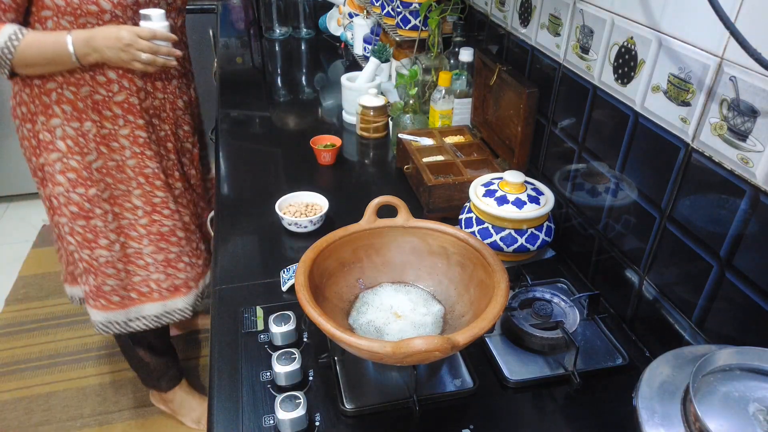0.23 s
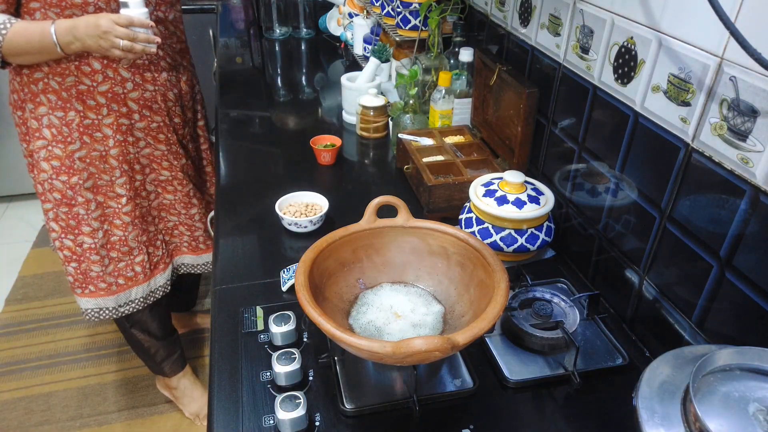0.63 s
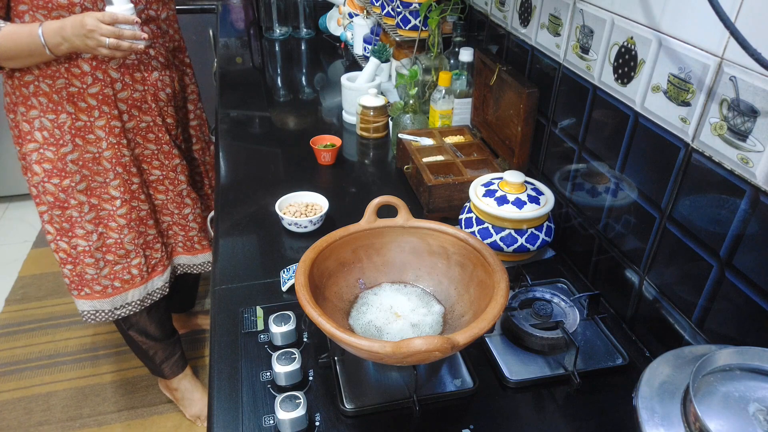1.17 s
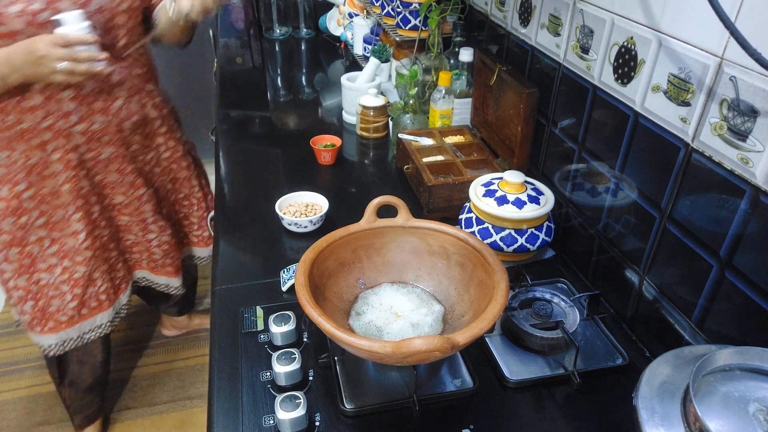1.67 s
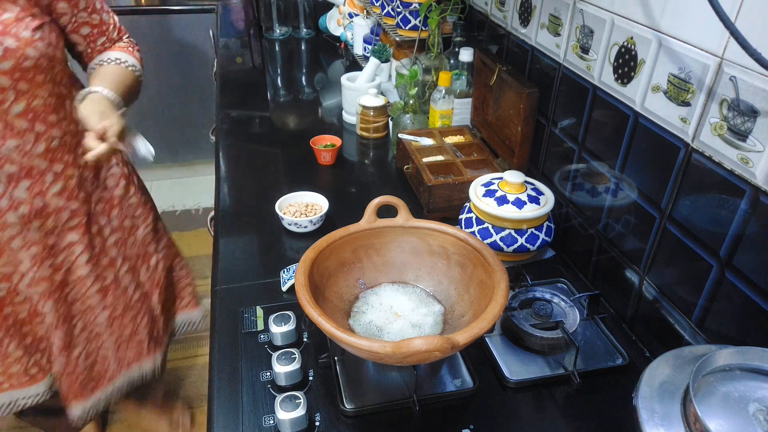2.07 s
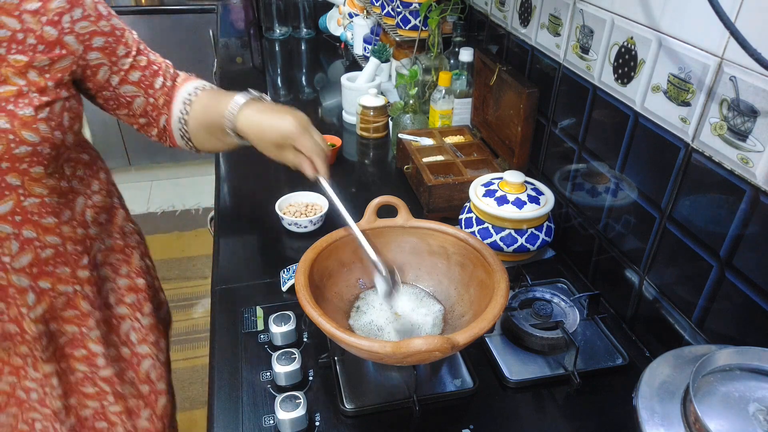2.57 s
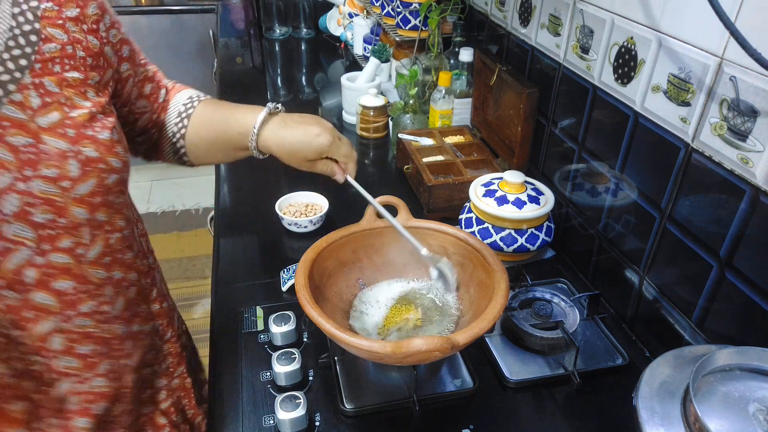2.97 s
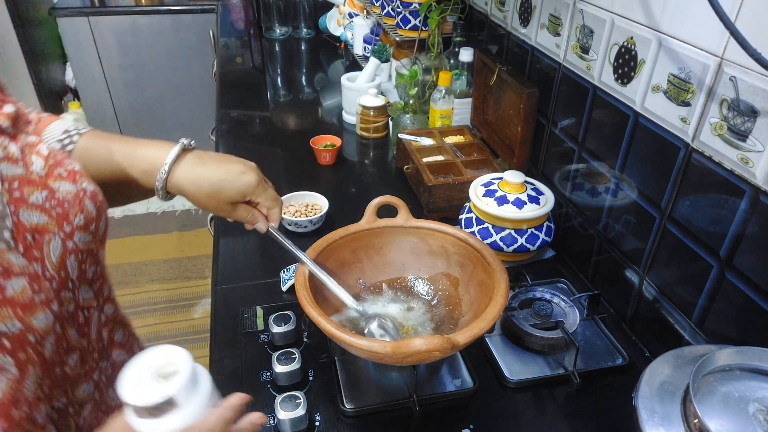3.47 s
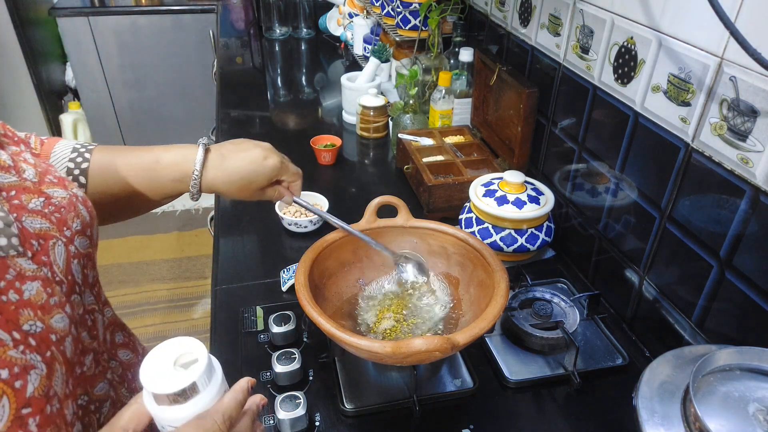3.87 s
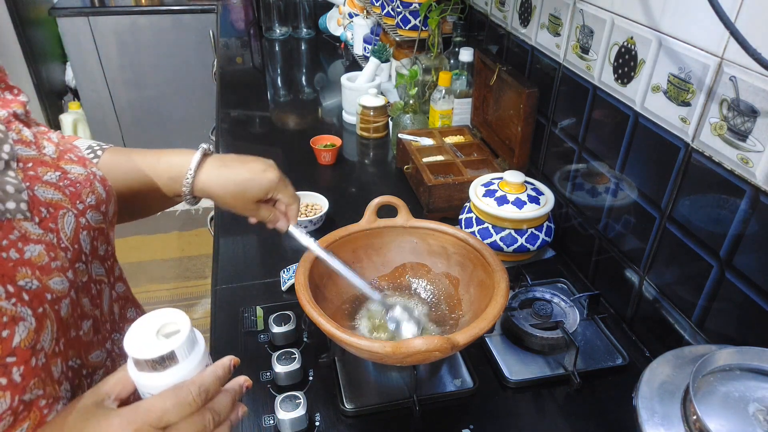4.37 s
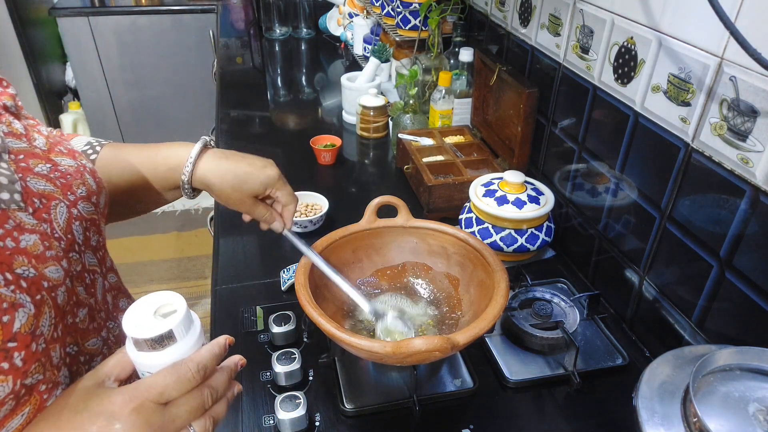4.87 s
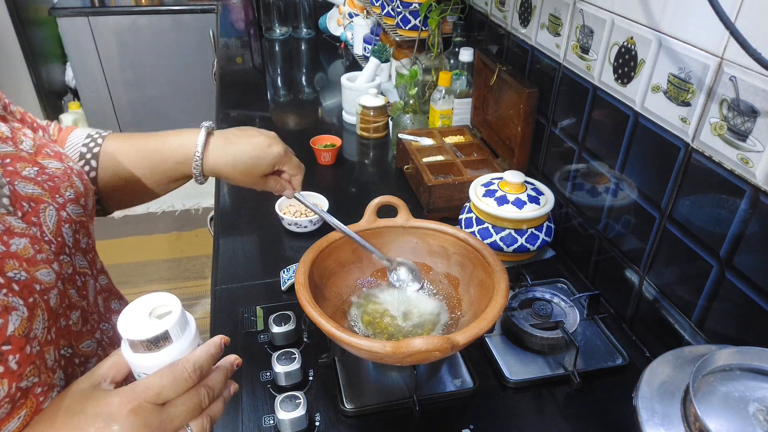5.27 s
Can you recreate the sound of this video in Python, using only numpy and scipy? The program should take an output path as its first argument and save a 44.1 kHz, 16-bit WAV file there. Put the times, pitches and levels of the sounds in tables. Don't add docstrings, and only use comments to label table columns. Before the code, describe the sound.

Close stereo sound of cooking in a hard, short-echo kitchen. Bright seed cracks dominate the first half, with handling rustle, a wooden drawer thud and a brief metallic scrape. Just before three seconds the ladle clacks into the pot; rhythmic gritty scrapes, hollow clay rings and wet oil gurgles follow while popping nearly stops. A soft low fan hum and fine hiss run throughout.

```python
import sys
import numpy as np
from scipy import signal
from scipy.fft import rfft, irfft, next_fast_len
from scipy.io import wavfile
from scipy.ndimage import uniform_filter1d, map_coordinates

SR = 44100
rng = np.random.default_rng(int(sys.argv[2]) if len(sys.argv) > 2 else 0)


def to_wav(s):
    ch = np.atleast_2d(s).T
    pcm = np.round(np.clip(ch, -1, 1) * 32767)
    wavfile.write(sys.argv[1], SR, pcm.astype(np.int16))


def attenuation_scalar(level_db):
    decades = np.asarray(level_db, float) / 20
    return 10 ** decades


N = 242991

# [t/s, level/dB]
FAN_STRENGTH = [(0, -43.5), (.9, -48.5), (1.6, -50), (2.5, -49.5), (3.4, -44), (3.8, -47), (4.5, -46.5),
                (5.51, -46.5)]
# [f/Hz, level/dB per Hz]
FAN_AIR = [(12, -70), (28, -49), (64, -16.5), (91, -11), (109, -3), (129, -7), (172, -12), (265, -14),
           (312, -13.5), (439, -19.5), (481, -11.5), (619, -27.5), (1500, -48.5), (1950, -95.5),
           (3300, -120)]
# [f/Hz, width/Hz, level/dB]
FAN_MOTOR = [(96.96, 6.54, 1.5), (312.8, 3.3, -12)]
# [t/s, level/dB]
FIZZ_STRENGTH = [(0.0, -56.5), (1.27, -51), (1.58, -63), (3.28, -54), (3.53, -49), (4.05, -58),
                 (4.33, -51.5), (4.51, -56), (5.51, -57)]
# [f/Hz, level/dB per Hz]
FIZZ_COLOUR = [(350, 6.5), (600, 4.5), (781, 3.5), (1180, -11.5), (1420, -4), (2570, -11), (6160, -13),
               (13000, -20), (15800, -19), (16500, -42.5)]
# [f/Hz, level/dB]
FIZZ_SIDE = [(300, -4.5), (800, 0.5), (3000, 2.5)]
# [f/Hz, t60/s]
KITCHEN_DECAY = [(300, 0.733), (1300, 0.379), (3500, 0.318), (9000, 0.2303), (16000, 0.2054)]
# [f/Hz, likeness 0-1]
ROOM_LIKENESS = [(300, .85), (700, .3), (1500, 0)]
# [left t/s, right t/s, level/dB]
COUNTER_ECHOES = [(.0017, 0.002, -37), (.0041, 0.0033, -7.5)]
# [f/Hz, level/dB per Hz]
MIC_HISS = [(1000, -120), (2000, -11), (6000, -7), (10000, -3), (13000, 4.5), (16000, -11)]
# [f/Hz, level/dB]
MIC_DIFFERENCE = [(200, 1), (5000, -1), (9000, -1), (13000, 5)]

# [t/s, rise/s,
# fade/s, dull level/dB, bright level/dB]
RUSTLES = [
    (0.011, 0.29, 0.059, -29, -23),
    (0.56, 0.021, 0.64, -39, -69.5),
    (0.704, 0.288, 0.064, -25.5, -22.5),
    (0.817, 0.021, 0.146, -28, -30.5),
    (0.882, 0.0116, 0.055, -44.5, -22.5),
    (0.96, 0.254, 0.583, -32.5, -28.5),
    (2.564, 0.04, 0.24, -46, -36.5),
    (2.744, 0.041, 0.112, -44, -48.5),
    (3.26, 0.097, 0.52, -58, -30.5),
]
# [f/Hz, level/dB per Hz]
RUSTLE_DULL = [(400, -120), (800, -3), (1500, 5), (2500, 5), (4500, 4), (7000, -18), (16000, -30.5)]
# [f/Hz, level/dB per Hz]
RUSTLE_BRIGHT = [(2000, -120), (4000, -2.5), (7000, -1), (10000, -5), (13000, 1), (16000, -8)]
# [t/s, peak level/dB]
DRAWER_THUDS = [
    (0.656, -18),
]
# [f/Hz, level/dB, t60/s]
CABINET_TONES = [(325.8, -5.5, 0.095), (394.3, -6.5, 0.189), (435.7, -1.5, 0.16), (489.5, -1, 0.162),
                 (569, -7.5, 0.204), (731.8, -5, 0.0767), (899, -4, 0.041), (1140, -14, 0.128)]
# [t/s, peak level/dB, centre f/Hz, t60/s]
LOW_BUMPS = [
    (0.705, -31.5, 515, 0.23),
    (1.204, -30.5, 322, 0.2),
    (1.264, -35, 367, 0.212),
    (2.843, -33.5, 407.5, 0.06),
    (2.844, -30, 728, 0.0524),
    (3.49, -35, 273, 0.497),
    (4.438, -36.5, 292, 0.053),
    (4.948, -38.5, 285, 0.175),
]
# [t/s, peak level/dB, centre f/Hz]
UTENSIL_KNOCKS = [(0.029, -32.5, 1410), (0.13, -28.5, 2860), (0.151, -15.5, 3500), (0.542, -31, 3177),
                  (0.657, -21.5, 890), (0.707, -45, 2860), (0.819, -26.5, 917), (0.819, -18.5, 1900),
                  (1.477, -32, 1556), (1.52, -48, 1510), (1.577, -41.5, 1490), (1.886, -26.5, 2940),
                  (2.129, -31, 4140), (2.508, -29, 3080), (2.563, -18.5, 3420), (2.607, -21.5, 3180),
                  (2.63, -21.5, 2296), (2.744, -25, 4100), (2.845, -16.5, 4000), (2.876, -16, 2950),
                  (2.89, -17.5, 4540), (3.106, -15.5, 2294), (3.144, -16, 3490), (3.256, -15.5, 3450),
                  (3.401, -37.5, 1325), (3.963, -36, 2720), (4.092, -16.5, 3220), (4.752, -31.5, 2150),
                  (5.415, -24.5, 2700)]

# [t/s, held/s, rasp level/dB]
LADLE_TUGS = [
    (1.145, .004, -34),
    (1.163, .006, -24.5),
    (1.198, .035, -17.5),
]
# [f/Hz, level/dB per Hz]
RASP_COLOUR = [(350, -27), (600, -11.5), (1360, -6), (1670, 1), (2060, -4), (2340, 4.5), (3690, -2.5),
               (4420, -2.5), (6160, -1.5), (13000, 0), (15600, -4.5), (16500, 1)]
# [f/Hz, width/Hz, level/dB]
STEEL_TONES = [(4100, 153, -12), (6815, 8, -21.5), (7440, 18.7, 1.5), (8064, 10, -4.5), (4495, 98, -6),
               (11790, 12, -9.5)]
# [t/s, peak level/dB, f/Hz, t60/s]
HANDLE_RINGS = [(1.199, -24, 2360, .06), (1.165, -33, 8240, .08), (1.2, -27, 7830, .08),
                (1.3, -37, 10435, .3), (1.35, -39, 10432, .5), (1.325, -35, 2640, .22),
                (1.335, -36, 2720, .2), (1.365, -38, 2690, .3), (1.3, -43, 8064, .3),
                (1.41, -50, 8062, .45), (1.33, -47, 6825, .75), (1.478, -50, 4050, .3)]

# [t/s at full force, rise/s, held/s, scrape level/dB, slosh level/dB]
STROKES = [(2.849, 0.0195, 0.0047, -29.5, -44), (3.151, 0.039, .005, -48, -59),
           (3.248, 0.102, 0.0047, -34, -63), (3.377, 0.21, 0.0878, -35, -42.5),
           (3.678, 0.1075, 0.016, -38, -28), (4.089, 0.0743, 0.1486, -33.5, -35),
           (4.41, 0.037, 0.05, -36, -37), (4.753, 0.0019, 0.088, -41, -62),
           (4.863, 0.101, 0.0384, -34.5, -27), (4.972, 0.059, 0.0471, -37.5, -35.5),
           (5.414, 0.0082, 0.027, -63.5, -42), (5.478, 0.017, .05, -37, -28)]
# [f/Hz, level/dB per Hz]
SCRAPE_COLOUR = [(290, -15.5), (500, -9.5), (924, -7), (1390, -7), (1890, -6.5), (3250, -2.5), (4490, -7),
                 (6100, -13), (15100, -23.5), (15800, -22), (16500, -60)]
# [f/Hz, width/Hz, level/dB]
CLAY_TONES = [(1830, 14.7, -6.5), (2150, 50, 14), (2552, 22, 7.5), (2990, 23, 5.5), (3800, 24, -7.5),
              (4357, 30.6, 14.5)]
# [t/s, peak level/dB, f/Hz]
OIL_GLUGS = [(3.302, -22, 1082), (3.338, -22, 1330), (3.348, -26.5, 1433), (3.365, -21, 1128),
             (3.378, -30, 1110), (3.422, -37, 1334), (3.482, -25, 1239), (3.3993, -26.5, 1222),
             (3.4665, -20.5, 1285), (4.115, -27.5, 1514), (4.15, -24.5, 1517), (4.163, -19, 1370),
             (4.181, -45.5, 1420), (4.2106, -23.5, 1228), (4.4325, -23, 1277), (4.821, -24.5, 1535),
             (4.837, -28.5, 1550), (4.852, -23, 1540), (4.872, -20, 1382), (4.888, -19, 1382),
             (4.905, -29, 1453)]
# [t/s, peak level/dB, f/Hz]
GRIT_CHIPS = [(3.2252, -21, 3914), (3.251, -17, 2990), (3.244, -22.5, 4100), (3.261, -24.5, 2623),
              (3.303, -20, 3715), (3.31, -24.5, 3150), (3.36, -24.5, 3260), (3.365, -21, 4100),
              (4.84, -22.5, 3213), (4.99, -25, 4430), (3.32, -17, 3726), (3.323, -20, 4437),
              (3.387, -17, 2429), (3.456, -26, 4440), (3.4002, -26.5, 3130), (3.4419, -18.5, 3058),
              (4.064, -42.5, 3180), (4.0731, -26, 2540), (4.0915, -23, 2360), (4.0943, -25.5, 3120),
              (4.108, -14.5, 3260), (4.215, -26.5, 3130), (4.541, -27, 3710), (4.787, -26, 2106),
              (4.1112, -24.5, 3200), (4.139, -14.5, 3613), (4.2118, -18.5, 3683), (4.406, -23, 3410),
              (4.8636, -14, 3283), (4.873, -23, 2687), (4.892, -18.5, 4414), (4.917, -17.5, 2644),
              (4.919, -22.5, 5175), (4.987, -20, 3075), (4.8943, -34, 3200), (4.9182, -22.5, 3706),
              (4.498, -30.5, 3674)]
# [t/s, peak level/dB]
GRAIN_SNAPS = [(2.8429, -20), (2.8649, -21), (3.7469, -31), (4.0542, -38), (4.0584, -33), (4.0637, -29),
               (4.0717, -29), (4.0854, -27), (4.0906, -22), (4.358, -33), (4.4049, -32), (4.7506, -32),
               (4.7554, -38), (4.7644, -33), (4.7714, -37), (4.7774, -35), (4.7851, -28), (4.7964, -31),
               (4.8744, -22), (4.9312, -22), (5.4146, -27), (5.4559, -27), (5.4746, -27), (5.4839, -25)]
# [f/Hz, level/dB per Hz]
SNAP_COLOUR = [(600, -40), (1300, -10), (2500, 0), (4500, -2), (7000, -12), (16000, -22)]
# [t/s, peak level/dB, f/Hz, t60/s]
EDGE_TOUCHES = [(5.4152, -36.5, 2536, .17), (5.4152, -38.5, 1852, 0.176), (5.4152, -33.5, 3490, 0.039),
                (5.4152, -47.5, 3490, .12), (5.4152, -33, 4267, 0.0355), (5.4152, -38, 5780, 0.024),
                (5.4565, -30, 2589, 0.114), (5.4565, -35.5, 3420, 0.071), (5.4752, -28.5, 2150, 0.046),
                (5.486, -21.5, 2193, 0.035), (5.5, -23.5, 3056, .05), (4.358, -27.5, 3946, 0.0126),
                (4.359, -34.5, 3524, 0.0274), (4.7515, -30.5, 2150, 0.0126), (4.7515, -36.5, 3680, 0.011),
                (2.8455, -16, 4182, 0.0217), (2.851, -27.5, 3870, 0.028), (2.865, -22, 3256, 0.027),
                (2.894, -33.5, 4550, 0.026)]
# [t/s, peak level/dB, upper tones over the lowest/dB]
BOWL_CATCHES = [(3.466, -32, -18), (3.478, -26.5, -11.5), (3.487, -37.5, 9), (3.504, -36, 8.5),
                (3.522, -35.5, 3.5), (3.5368, -36, -17), (3.581, -38.5, -12.5), (3.6372, -32, -14.5),
                (3.657, -27.5, -5), (3.679, -27, 0.5), (3.695, -37, 4), (3.74, -34, 0),
                (4.2119, -21.5, -11.5), (4.228, -26, -1), (4.29, -25.5, -2.5), (4.4373, -24, 1),
                (4.452, -35.5, -15.5), (4.4671, -35.5, -25), (4.358, -34, -13.5), (4.503, -36, -15.5),
                (4.978, -29, -8.5), (4.998, -27.5, -5.5), (5.038, -28.5, -6), (5.052, -39, 7.5),
                (5.415, -54, 0), (5.475, -40.5, 5)]
# [t/s, peak level/dB]
RIM_TAPS = [
    (5.0299, -38),
    (5.066, -32),
    (5.415, -45),
    (5.45, -35),
]
# [f/Hz, level/dB, t60/s]
RIM_TONES = [(1302, 0, .5)]

# [t/s, peak level/dB, body below the crack/dB, left over right/dB]
SEED_POPS = [(0.1508, -9, -9.5, 6), (0.3532, -8, -17.5, -2), (0.3822, -13, -9, -2.5),
             (0.4348, -19, -9, -0.5), (0.622, -22, -8, -4.5), (0.8842, -5.5, -17.5, -5.5),
             (0.9501, -11.5, -10.5, 2.5), (0.98, -18, -22, 9), (1.007, -19, -6.5, -1), (1.086, -31, -8, 9),
             (1.4139, -17, -10, -0.5), (1.7391, -16.5, -19.5, -6), (1.9946, -27.5, -10.5, 0.5),
             (2.0524, -12.5, -18.5, 4.5), (2.243, -33, -14, 1.5), (2.2605, -15.5, -7, -1.5),
             (2.3322, -22, -10, 0.5), (2.3885, -30.5, -14, -1.5), (2.48, -25.5, -10, 0.5),
             (2.5502, -25.5, -12, -7.5), (2.7291, -23, -18, -6.5), (2.8263, -25.5, -10.5, -2),
             (2.933, -22.5, -23, -1), (2.9849, -13.5, -11.5, -1.5), (3.052, -23, -5.5, 4),
             (3.087, -16, -6, 5.5), (3.1577, -22.5, -17.5, -5.5), (3.4126, -12.5, -12, 6),
             (3.4557, -14, -5, 0.5), (3.8479, -29, -11, 7), (1.971, -49.5, -13.5, 8.5),
             (2.8766, -23, -19.5, -0.5), (2.894, -25, -21.5, 5), (3.1273, -32, -23, -0.5),
             (3.17, -21, -26, -5), (3.225, -29, -22, -4), (3.308, -29.5, -7, 3), (4.9318, -36, -3.5, 0),
             (4.5416, -31, 0, 2.5), (4.494, -33.5, -12.5, 0.5)]
# [t/s, peak level/dB, body below the crack/dB, left over right/dB]
SEED_BOUNCES = [(0.5559, -28, 0.5, -0.089), (1.7537, -15.5, -5, 0.26), (2.043, -27, -3, -0.059),
                (2.071, -30.5, -0.5, 2), (2.093, -28, -11.5, 0.047), (2.565, -29, -20.5, 0),
                (2.606, -23.5, -7, 0), (2.7091, -30.5, 0, -1), (2.774, -27.5, -5, 0), (3.436, -23, -6.5, 1)]
# [f/Hz, level/dB per Hz]
CRACK_COLOUR = [(1470, -76), (2500, -10), (4780, -12), (5960, -17), (7670, 1.5), (9720, 0.5), (13700, 7),
                (15600, -0.5), (16500, -36.5)]
# [f/Hz, level/dB per Hz]
BODY_COLOUR = [(500, -120), (900, 8.5), (1600, 14.5), (3000, 20), (5000, 19), (8000, 14), (16000, -29.5)]
# [t/s, left level/dB, right level/dB]
POT_ECHOES = [(.001, -3, 0), (.0019, -13, -10), (.0045, -17, -13)]


def unit(x):
    return x / np.sqrt(np.mean(x ** 2) + 1e-20)


def along(points, hz):
    f, v = np.transpose(points)
    return np.interp(np.log(hz + 1), np.log(f + 1), v)


def level_curve(points):
    s, db = np.transpose(points)
    return np.interp(np.arange(N) / SR, s, db)


def filtered(x, response):
    m = next_fast_len(x.shape[-1] + SR // 2)
    return irfft(rfft(x, m) * response(np.fft.rfftfreq(m, 1 / SR)), m)[..., :x.shape[-1]]


def resonances(modes):
    def response(f):
        total = 0
        for k, (centre, width, db) in enumerate(modes):
            damping = 1j * f * width
            total = total + (-1) ** k * attenuation_scalar(db) * damping / (centre * centre - f * f + damping)
        return total
    return response


def colour(spectrum):
    return lambda f: attenuation_scalar(along(spectrum, f))


def causal(spectrum, size):
    c = irfft(np.log(attenuation_scalar(along(spectrum, np.fft.rfftfreq(size, 1 / SR))) + 1e-4))
    c[1:size // 2] *= 2
    c[size // 2 + 1:] = 0
    pulse = irfft(np.exp(rfft(c)))
    return pulse / np.abs(pulse).max()


def wavelet(spectrum, size=256):
    strength = attenuation_scalar(along(spectrum, np.fft.rfftfreq(size, 1 / SR)))
    pulse = np.roll(irfft(strength * np.exp(-1j)), size // 2) * np.hanning(size) ** 6
    return pulse / np.abs(pulse).max()


def gritty(grit_db, grain_s, channels=1):
    sizes = map_coordinates(rng.standard_normal(N), [np.arange(N) / (grain_s * SR + 1)], order=1)
    return rng.standard_normal((channels, N)) * attenuation_scalar(grit_db * sizes)


def patchy(x, patchy_db):
    z = signal.stft(x, nperseg=256)[2]
    field = uniform_filter1d(rng.standard_normal(z.shape), 3, axis=0)
    field = uniform_filter1d(field, 9, axis=1)
    return signal.istft(z * attenuation_scalar(patchy_db * unit(field)), nperseg=256)[1][:N]


def swell(s, rise, held, fade):
    t = np.arange(N) / SR - s
    before = np.maximum(-t, 0) / max(rise, 1e-3)
    after = np.maximum(t - held, 0) / max(fade, 1e-3)
    return attenuation_scalar(-30 * (before + after))


def add(track, s, x):
    part = track[..., round(s * SR):][..., :x.shape[-1]]
    part += x[..., :part.shape[-1]]


def bubbles(events, rise, attack):
    out = np.zeros(N)
    for s, db, hz, t60 in events:
        t = np.arange(round(min(t60, .5) * SR)) / SR
        tone = np.sin(2 * np.pi * hz * t * (1 + rise * t / t60))
        add(out, s, attenuation_scalar(db - 60 * t / t60) * (1 - np.exp(-t / attack)) * tone)
    return out


def ringing(events, modes, attack):
    out, t = np.zeros(N), np.arange(SR // 2) / SR
    for s, db in events:
        ring = 0
        for hz, level, t60 in modes:
            strength = attenuation_scalar(level + rng.normal(0, 0.29) - 60 * t / t60)
            ring = ring + strength * np.sin(2 * np.pi * hz * t)
        add(out, s, attenuation_scalar(db - 4.0) * ring * (1 - np.exp(-t / attack)))
    return out


def knocks(events, breadth):
    out, t = np.zeros(N), np.arange(SR // 5) / SR
    for s, db, hz, t60 in events:
        resonance = resonances([(hz, breadth * hz, 0)])
        puff = rng.standard_normal(len(t)) * attenuation_scalar(-60 * t / t60)
        puff = filtered(puff, lambda f: resonance(f) ** 2)
        add(out, s, attenuation_scalar(db) * puff / np.abs(puff).max())
    return out


def extractor_fan():
    strength_db = level_curve(FAN_STRENGTH)
    mix = np.array([[1, 0.294], [1, -0.278]])
    air = unit(mix @ filtered(rng.standard_normal((2, N)), colour(FAN_AIR)))
    drone = 0
    for hz, width, db in FAN_MOTOR:
        hum = filtered(rng.standard_normal(N), resonances([(hz, width, 0)]))
        drone = drone + attenuation_scalar(db) * unit(hum)
    wander_hz = unit(filtered(rng.standard_normal(N), lambda f: f < 3))
    turns = np.cumsum(165 + wander_hz) / SR
    blades = attenuation_scalar(-51) * np.sin(2 * np.pi * turns)
    ears_db = np.array([[-2.5], [.5]])
    return attenuation_scalar(strength_db - 3.5) * air + blades + drone * attenuation_scalar(strength_db - 0.5 + ears_db)


def oil_fizz():
    grains = gritty(grit_db=4.0, grain_s=0.0033, channels=2)
    middle_side = filtered(grains, lambda f: attenuation_scalar(along(FIZZ_COLOUR, f) + [0 * f, along(FIZZ_SIDE, f)]))
    ears = np.array([[1, 0.97], [1, -1.27]]) @ middle_side
    return attenuation_scalar(level_curve(FIZZ_STRENGTH) + 3.5) * unit(ears)


def room(x, seconds=.5):
    out, hop = np.zeros((2, N)), SR // 5
    for start in range(0, N, hop):
        hz, t, z = signal.stft(rng.standard_normal((2, int(seconds * SR))), SR, nperseg=256)
        alike = along(ROOM_LIKENESS, hz)[:, None]
        z = np.array([z[0], alike * z[0] + np.sqrt(1 - alike ** 2) * z[1]])
        fade = attenuation_scalar(-60 * t / along(KITCHEN_DECAY, hz)[:, None])
        tail = signal.istft(z * fade, SR, nperseg=256)[1]
        tail = tail / np.linalg.norm(tail[0])
        add(out, start / SR + .003, signal.fftconvolve(x[None, start:start + hop], tail, axes=1))
    return out


def rustle():
    dull, bright = gritty(grit_db=6.0, grain_s=.003, channels=2)
    dull = unit(filtered(dull, colour(RUSTLE_DULL)))
    bright = unit(filtered(bright, colour(RUSTLE_BRIGHT)))
    out = np.zeros(N)
    for s, rise, fade, dull_db, bright_db in RUSTLES:
        rub = attenuation_scalar(dull_db - 9.5) * dull + attenuation_scalar(bright_db - 10.5) * bright
        out += swell(s, rise, 0, fade) * rub
    return out


def drawer_and_bumps():
    thuds = ringing(DRAWER_THUDS, CABINET_TONES, attack=0.0044)
    return thuds + knocks(LOW_BUMPS, breadth=0.397)


def utensil_knocks():
    t60_s = 0.0316
    return knocks([(*knock, t60_s) for knock in UTENSIL_KNOCKS], breadth=.9)


def ladle_out():
    rise_s, fade_s = .0012, .18
    force = sum(attenuation_scalar(db) * swell(s, rise_s, held, fade_s) for s, held, db in LADLE_TUGS)
    rub = gritty(grit_db=2.5, grain_s=0.00099)[0]
    rasp = unit(patchy(filtered(rub, colour(RASP_COLOUR)), patchy_db=3.0))
    ring = filtered(attenuation_scalar(8.5) * force * rub, resonances(STEEL_TONES))
    return force * rasp + ring


def slosh(push):
    start_hz, end_hz, sag_s = 1425, 1246.3, .1
    t = np.arange(N) / SR
    starts = np.array([0] + [row[0] for row in STROKES])
    since = t - starts[np.searchsorted(starts, t, side="right") - 1]
    pitch_hz = end_hz + (start_hz - end_hz) * np.exp(-since / sag_s)
    phase = 2 * np.pi * np.cumsum(pitch_hz) / SR
    slow = filtered(rng.standard_normal((2, N)), lambda f: 1 / (1 + (f / 180) ** 2))
    return attenuation_scalar(-12.5) * push * unit(slow[0] * np.cos(phase) + slow[1] * np.sin(phase))


def stirring():
    fade_s, oil_lag_s = 0.148, 0.0012
    strokes = np.array([swell(s, rise, held, fade_s) for s, rise, held, *_ in STROKES])
    scrape, push = attenuation_scalar(np.transpose(STROKES)[3:]) @ strokes
    push = np.pad(push, (round(oil_lag_s * SR), 0))[:N]
    rub = gritty(grit_db=4, grain_s=.0008)[0]
    hard = unit(rub * (np.abs(rub) > 3.5 * rub.std()))
    crunch = filtered(unit(rub) + attenuation_scalar(-9) * hard, colour(SCRAPE_COLOUR))
    grate = scrape * unit(patchy(crunch, patchy_db=2.5))
    hum = filtered(unit(rub) * attenuation_scalar(3.0) * scrape, resonances(CLAY_TONES))
    glugs = bubbles([(*g, .04) for g in OIL_GLUGS], rise=0.0913, attack=0.00054)
    chips = bubbles([(*c, .018) for c in GRIT_CHIPS], rise=0.0085, attack=0.000375)
    chatter = .85 + .45 * unit(filtered(rng.standard_normal((2, N)), lambda f: f < [[160], [400]]))
    rocking = unit(filtered(rng.standard_normal(N), resonances([(230, 115, 0)])))
    contact = attenuation_scalar(-19) * scrape * rocking + grate + hum
    return contact + slosh(push) + chatter[0] * glugs + chatter[1] * chips


def grit():
    out = np.zeros(N)
    for s, db in GRAIN_SNAPS:
        add(out, s, attenuation_scalar(db + 6) * causal(SNAP_COLOUR, size=128))
    return out + bubbles(EDGE_TOUCHES, rise=0, attack=0.00041)


def rings():
    wobble = unit(filtered(rng.standard_normal((4, N)), lambda f: f < 60))
    flutter = attenuation_scalar(4 * np.tanh(wobble) - 1)
    t60_s = .12
    low = bubbles([(s, db, 1847, t60_s) for s, db, _ in BOWL_CATCHES], rise=0, attack=0.0048)
    middle = bubbles([(s, db + upper + 0.5, 2565, t60_s) for s, db, upper in BOWL_CATCHES],
                     rise=0, attack=0.0054)
    high = bubbles([(s, db + upper - 8.5, 3045, t60_s) for s, db, upper in BOWL_CATCHES],
                   rise=0, attack=0.0046)
    clay = (flutter[1:] * [low, middle, high]).sum(axis=0)
    clay = clay + ringing(RIM_TAPS, RIM_TONES, attack=0.00267)
    steel = flutter[0] * bubbles(HANDLE_RINGS, rise=0, attack=0.00147)
    return steel + np.array([clay, np.roll(clay, shift=4)])


def burst_hits():
    t = np.arange(SR // 30) / SR
    spray = attenuation_scalar(-17 - 60 * t / 0.008) + attenuation_scalar(-22 - 60 * t / 0.044)
    hits = spray * rng.standard_normal((2, len(t))) * (t > .0002)
    alike = .3
    hits[1] = alike * hits[0] + np.sqrt(1 - alike ** 2) * hits[1]
    hits[:, 0] = attenuation_scalar([6.5, 3.5])
    for ear in range(2):
        for delay, *echo_db in POT_ECHOES:
            luck = rng.standard_normal()
            hits[ear, round(delay * (1 + .08 * luck) * SR)] += attenuation_scalar(echo_db[ear] + 2 * luck)
    return hits


def seeds():
    out, bare = np.zeros((2, N)), np.zeros(N)
    crack = wavelet(CRACK_COLOUR)
    body = np.pad(causal(BODY_COLOUR, size=128), (128, 0))
    hz = np.fft.rfftfreq(len(crack), 1 / SR)
    for s, db, body_db, pan_db in SEED_POPS + SEED_BOUNCES:
        pulse = attenuation_scalar(-6.0) * (crack + attenuation_scalar(body_db + 5.0) * body)
        start = s - 128 / SR
        ears = attenuation_scalar(db + np.array([[.5], [-.5]]) * pan_db)
        add(out, start, ears * signal.fftconvolve(burst_hits(), pulse[None], axes=1))
        tint = along([(1000 * 1.5 ** k, v) for k, v in enumerate(rng.normal(0, 3, 8))], hz)
        add(bare, start, attenuation_scalar(db) * irfft(rfft(pulse) * attenuation_scalar(tint), len(pulse)))
    return out + attenuation_scalar(8.5) * room(bare)


def off_counter(work):
    def response(f):
        def delay(left, right):
            return np.exp(-2j * np.pi * f * np.array([[left], [right]]))
        echoes = sum(attenuation_scalar(db) * delay(left, right) for left, right, db in COUNTER_ECHOES)
        return attenuation_scalar(-5.5) * (delay(0, 1 / SR) + echoes)
    return filtered(work, response)


def scene():
    background = extractor_fan() + oil_fizz()
    lows = drawer_and_bumps()
    work = rustle() + utensil_knocks() + ladle_out() + stirring() + grit()
    tones = rings()
    answer = room(attenuation_scalar(-4.0) * work + attenuation_scalar(-7.0) * lows + attenuation_scalar(-12.0) * tones[0])
    return background + answer + lows + off_counter(work) + tones + seeds()


def low_pass(x):
    return signal.sosfilt(signal.butter(12, 17000, fs=SR, output="sos"), x)


def record(dry):
    hiss = attenuation_scalar(-63.0) * unit(filtered(rng.standard_normal((2, N)), colour(MIC_HISS)))

    def openings(f):
        return (f < 15900) * attenuation_scalar(along(MIC_DIFFERENCE, f) * np.array([[-.5], [.5]]))
    mix = filtered(dry + hiss, openings)
    return low_pass(mix)


dry = scene()
out = record(dry)
to_wav(out)
```